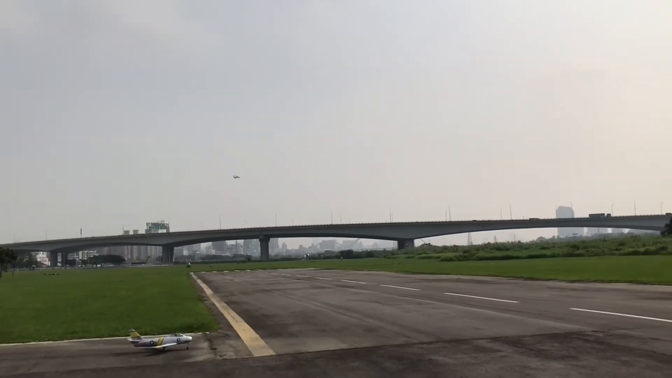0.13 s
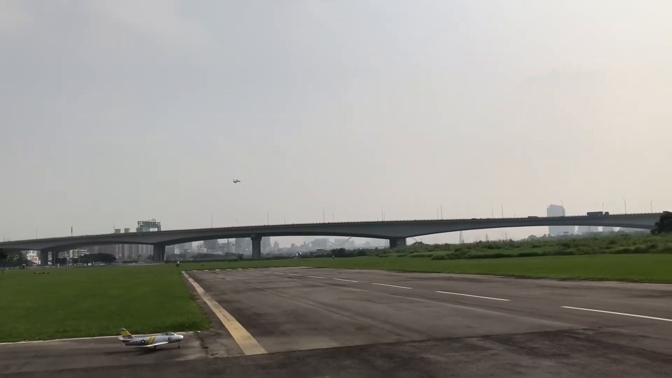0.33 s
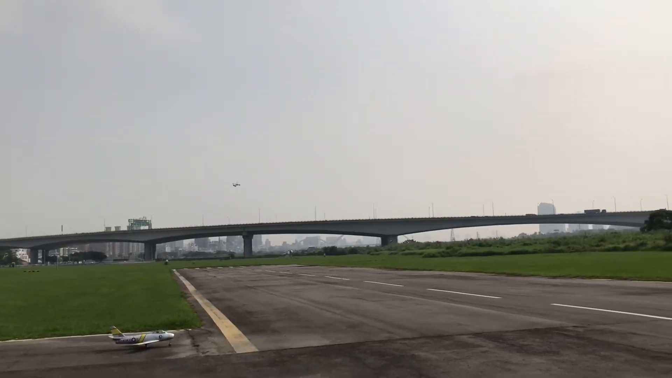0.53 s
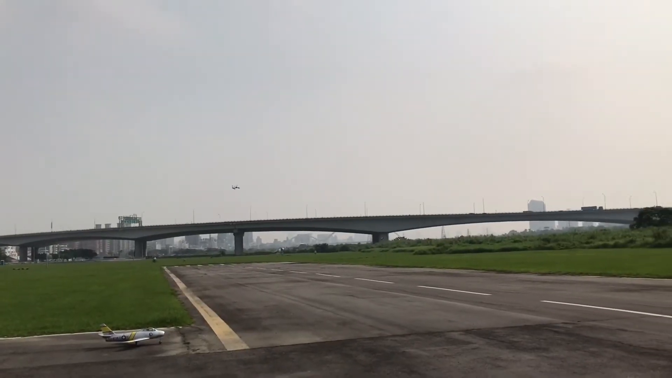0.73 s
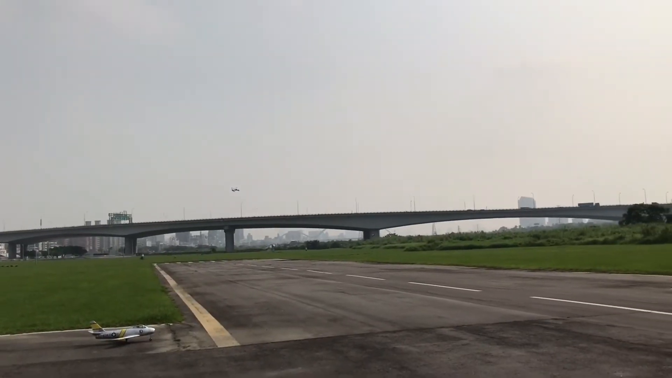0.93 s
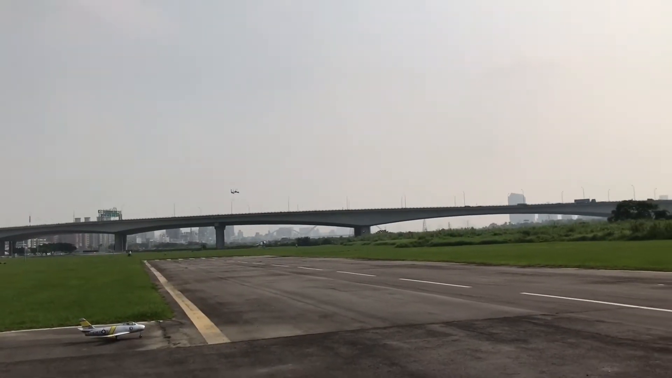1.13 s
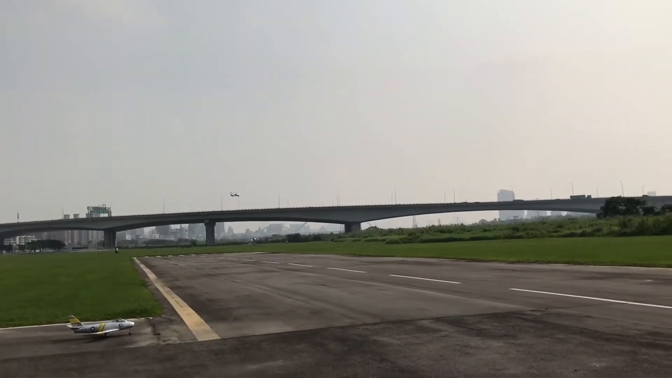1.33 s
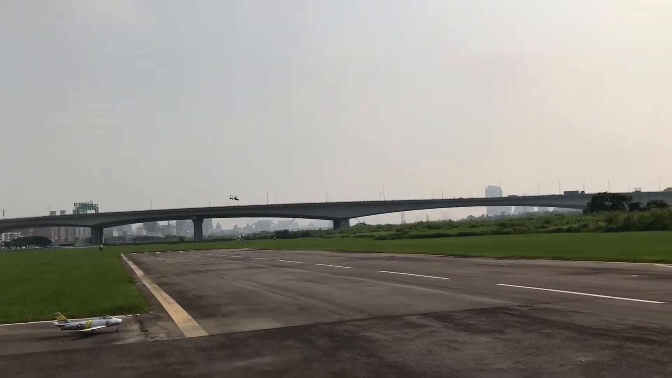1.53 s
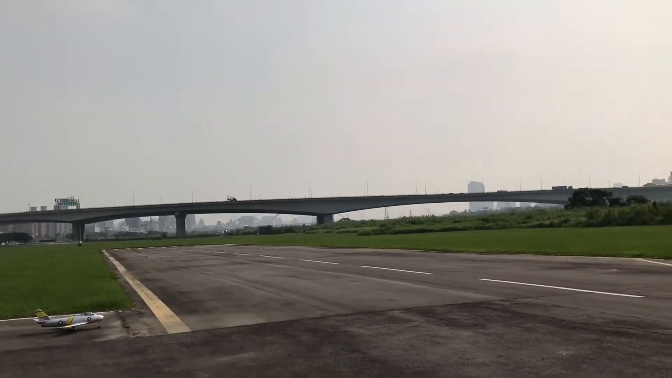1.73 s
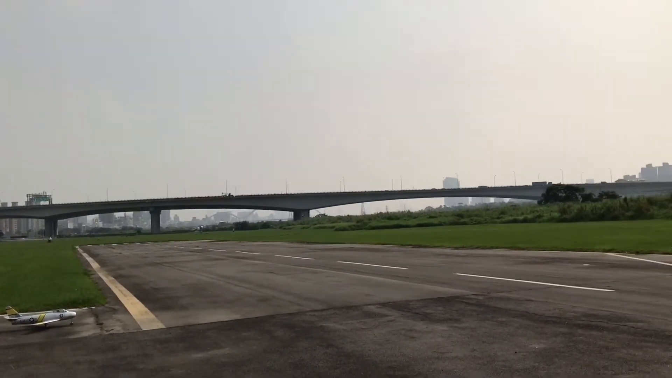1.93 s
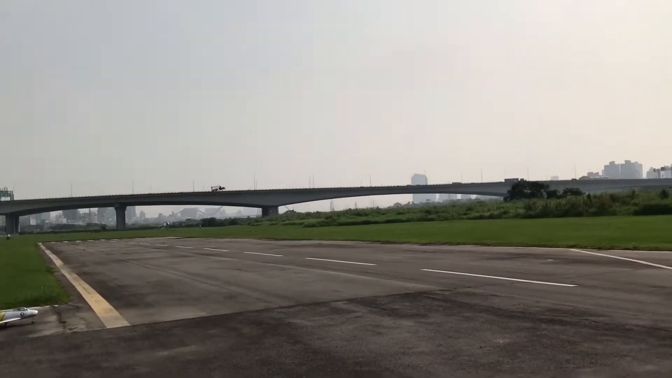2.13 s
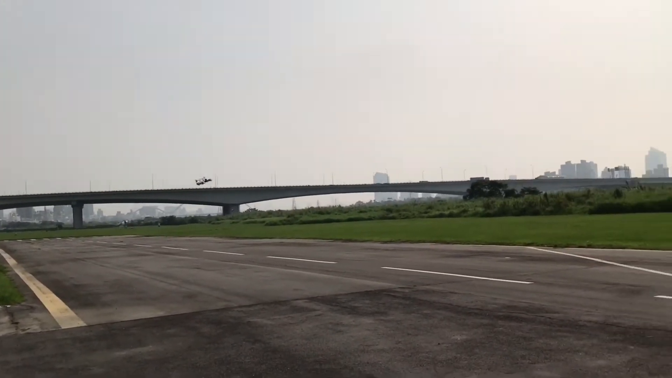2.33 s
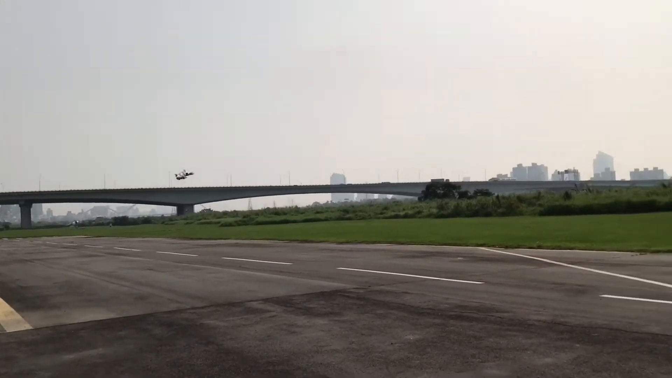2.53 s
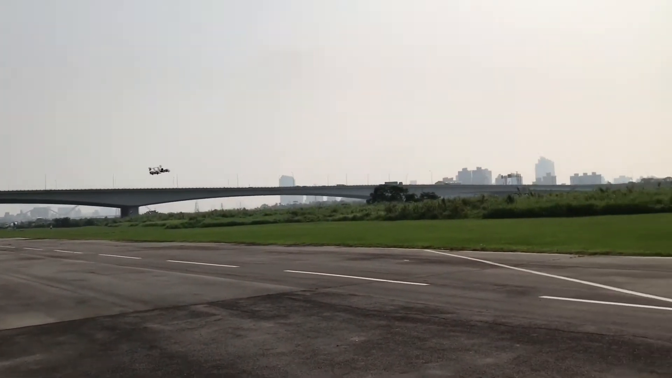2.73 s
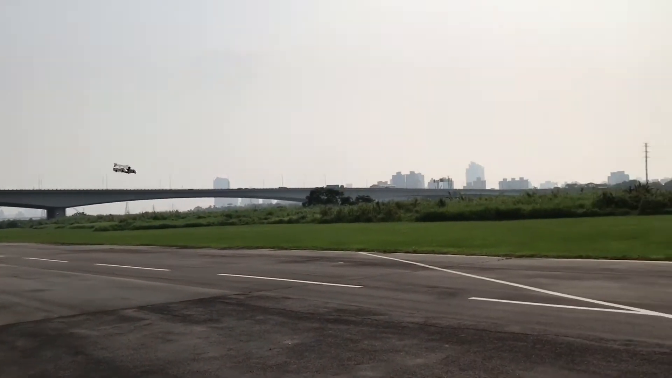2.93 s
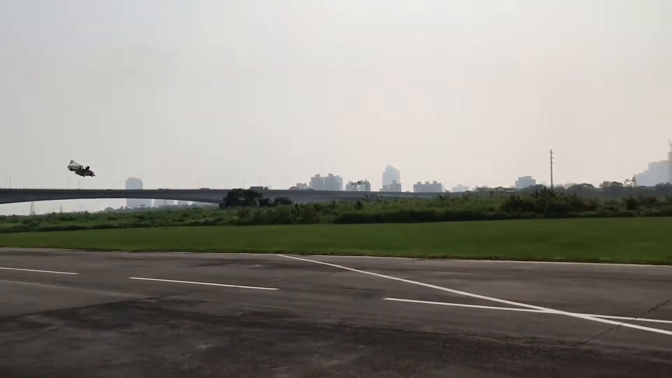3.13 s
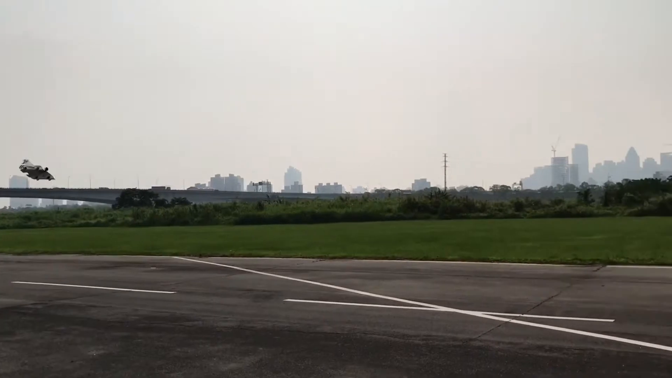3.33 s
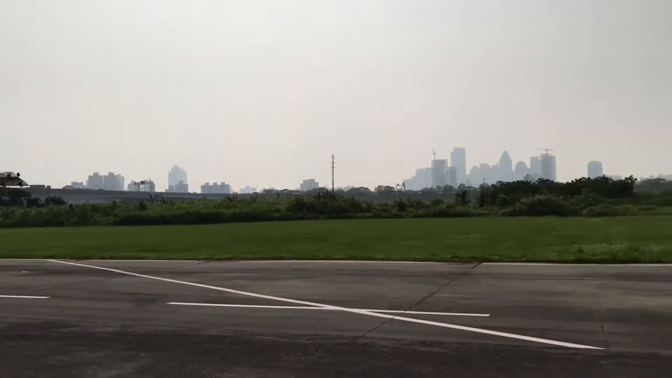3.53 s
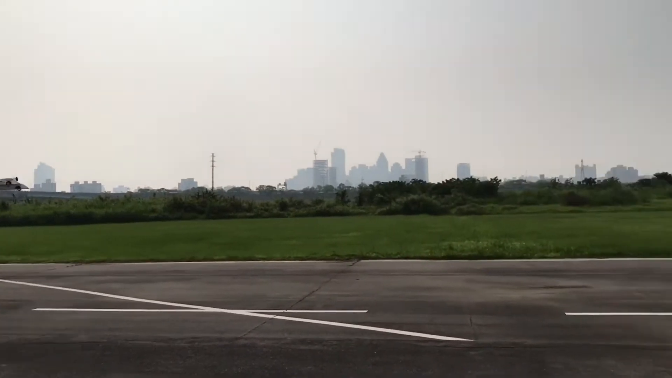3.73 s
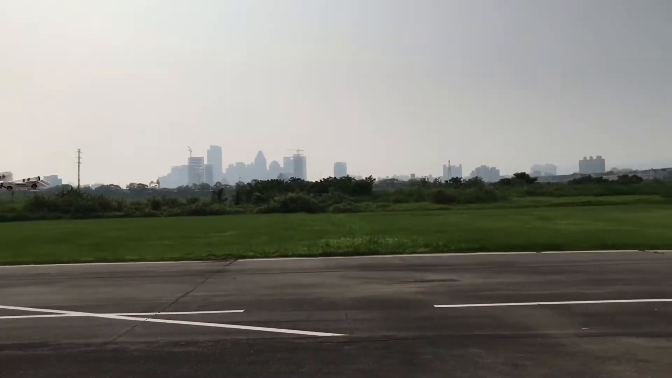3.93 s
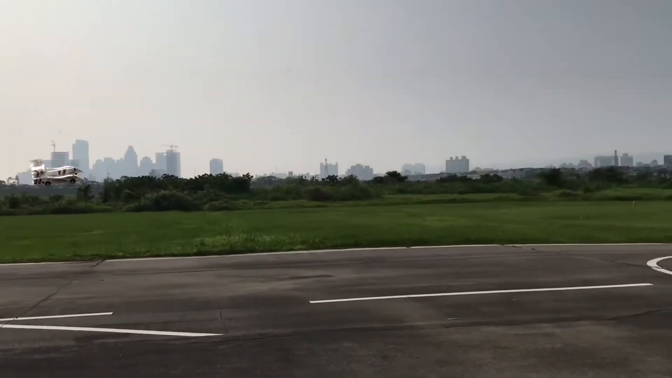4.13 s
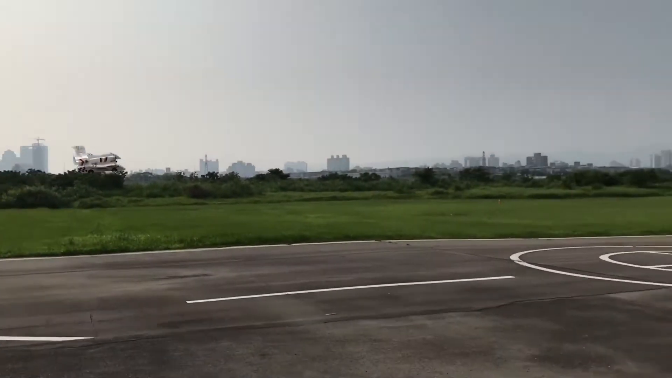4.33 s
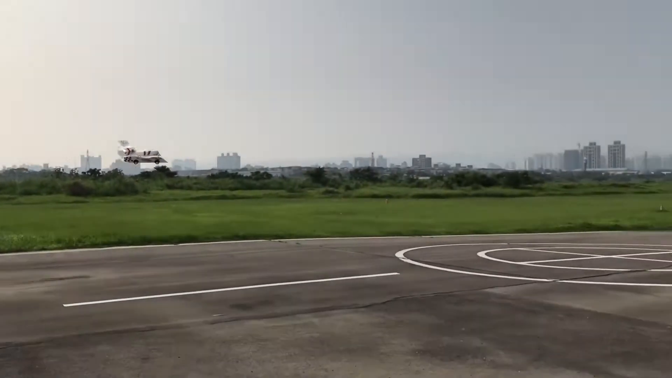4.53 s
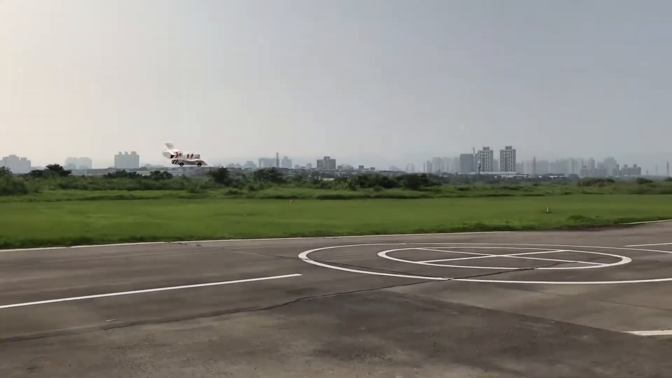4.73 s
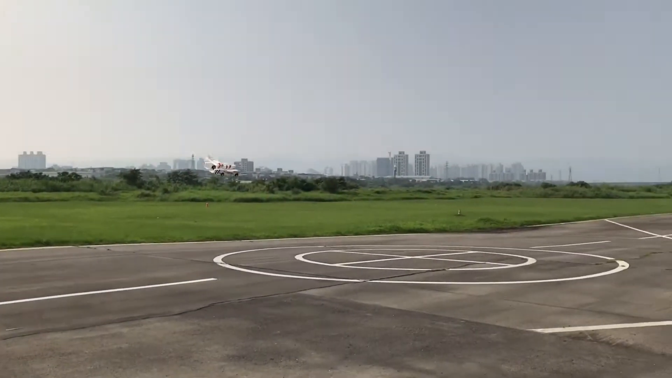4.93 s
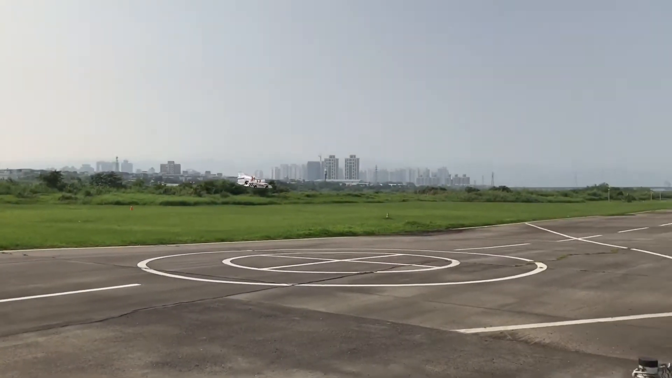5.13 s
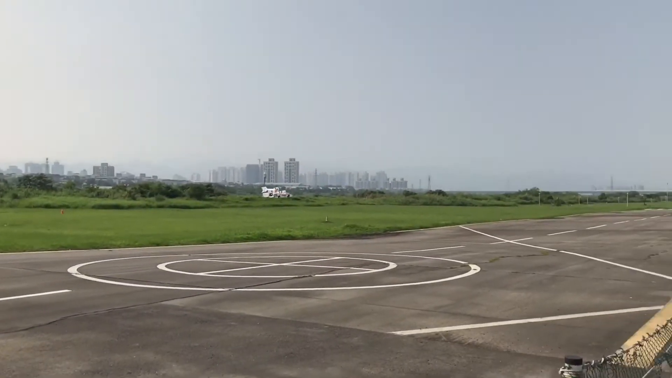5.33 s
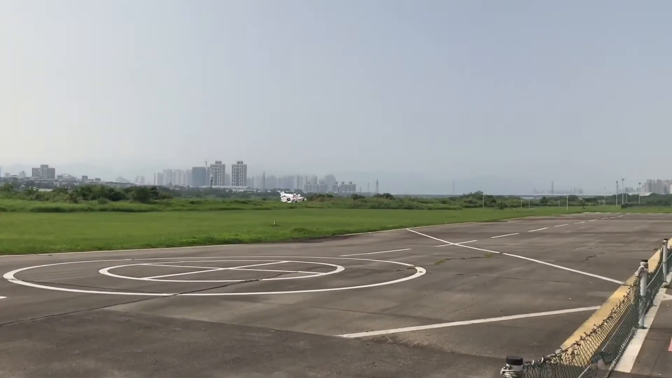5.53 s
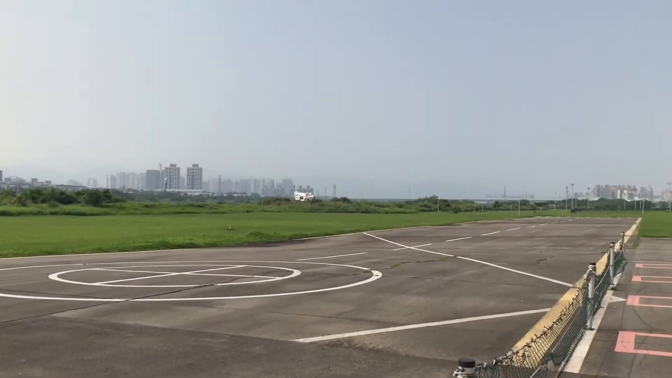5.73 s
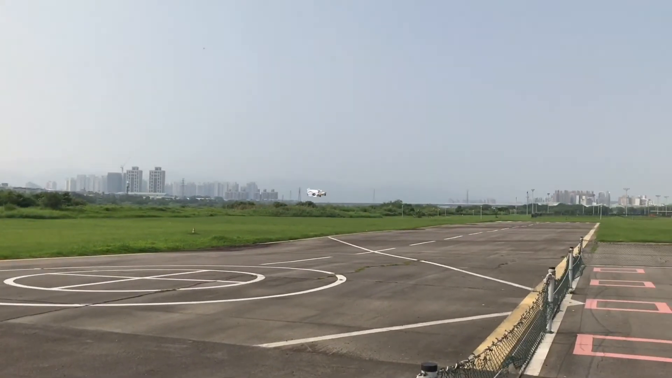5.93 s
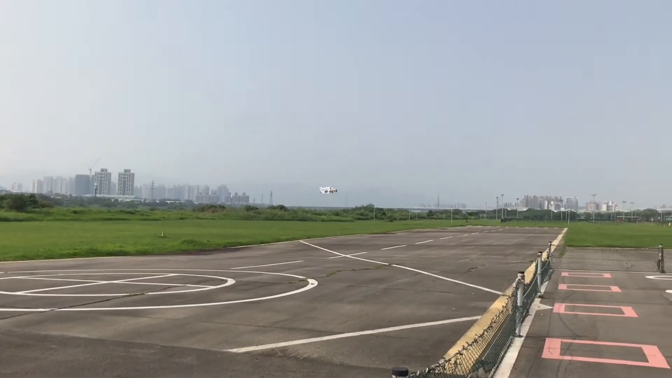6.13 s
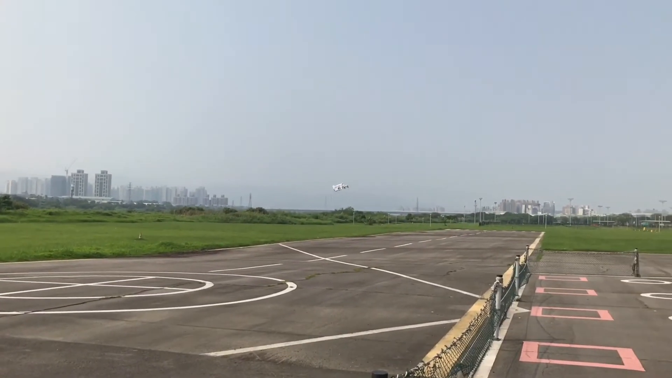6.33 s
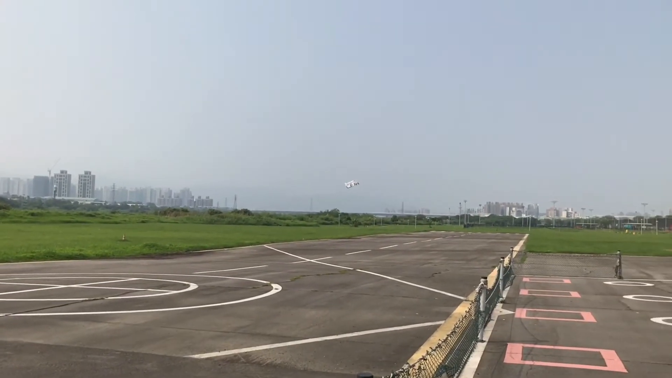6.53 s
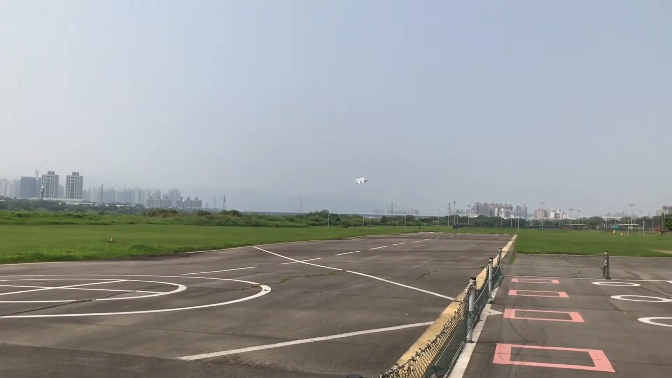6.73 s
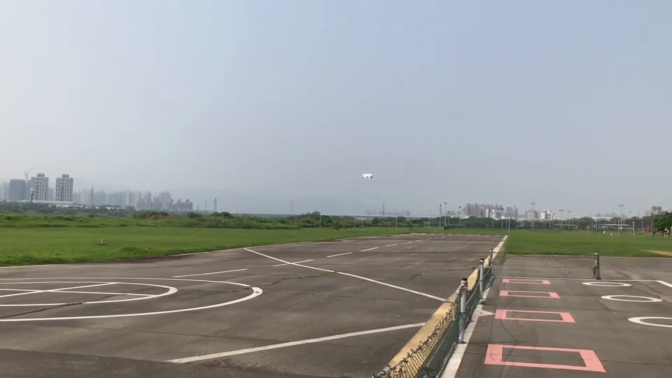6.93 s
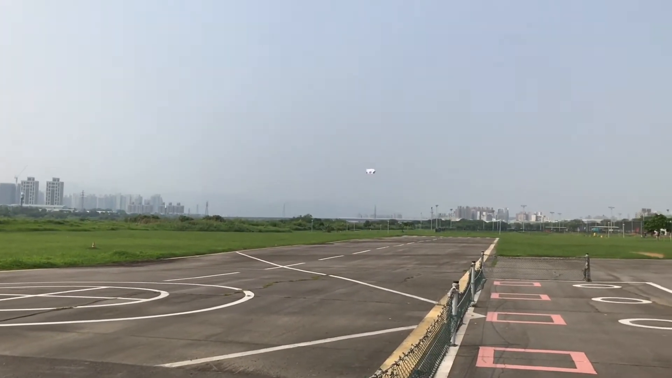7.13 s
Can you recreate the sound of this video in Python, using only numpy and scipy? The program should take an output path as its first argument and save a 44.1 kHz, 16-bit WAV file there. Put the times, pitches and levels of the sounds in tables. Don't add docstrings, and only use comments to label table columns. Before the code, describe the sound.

A handheld microphone at a flying field first catches quiet wind, distant road wash and tiny insect chirps beneath a faint high fan whine. The model jet comes closer, its rushing hiss swelling and its whine wavering and sagging slightly. Wind gusts thump and crackle on the microphone, with one sharp casing click. After the pass, the buffeting eases and the whine climbs quickly, then holds high as the jet departs.

```python
import sys
import numpy as np
from scipy import signal
from scipy.io import wavfile
from scipy.ndimage import uniform_filter1d, map_coordinates

SR = 44100
rng = np.random.default_rng(int(sys.argv[2]) if len(sys.argv) > 2 else 0)


def ratio_of_db(decibels):
    return 10 ** (np.asarray(decibels, float) / 20)


def unload_wav(signal):
    wavfile.write(
        sys.argv[1],
        SR,
        np.round(np.clip(np.atleast_2d(signal).T, -1, 1) * 32767).astype(np.int16),
    )


N = 317520
T = np.arange(N) / SR
BLADES = 12

# time_s, hiss_db, treble_db (against the hiss)
HISS = [(0, -60, -4), (.2, -56, -6), (.48, -57.5, -10.5), (.78, -53.5, -14), (.9, -53, 1),
        (1.06, -53, -4.5), (1.9, -53, -3.5), (2.36, -48.5, -5), (2.85, -51, -0.5), (3.27, -47, -1.5),
        (3.8, -46.5, -3.5), (4.25, -42, -6.5), (4.5, -47, -1.5), (4.95, -43, -6.5), (5.5, -44.5, -4.5),
        (5.9, -43, -4.5), (6.68, -46, -2.5), (7.2, -46.5, -5)]
# time_s, aim (0 nose on, 1 side on, 2 tail on)
AIM = [(0, 0.0067), (3.3, 0.2), (4.3, 0.41), (5.4, 1.2), (6, 1.2), (6.5, 1.56), (7.2, 1.58)]
# time_s, share (0-1)
ECHO = [(0, .7), (3.5, .66), (4.1, .48), (4.6, .6), (5.2, .55), (5.6, .55), (6.3, .62), (7.2, .68)]


def evened(x):
    return x / np.sqrt(np.mean(x ** 2) + 1e-20)


def curves(rows, t=T):
    s, *columns = np.transpose(rows)
    return [np.interp(t, s, column) for column in columns]


def read(points, hz):
    f, db = np.transpose(points)
    return np.interp(np.log(hz + 1), np.log(f + 1), db, left=-90, right=-90)


def add(mix, s, sound):
    part = mix[round(s * SR):][:len(sound)]
    part += sound[:len(part)]


def smooth(x, size):
    return uniform_filter1d(x, size=size, mode="nearest")


def flutter(rate):
    size = max(int(SR / rate), 1)
    wander = uniform_filter1d(rng.standard_normal(N), size, mode="wrap")
    return evened(uniform_filter1d(wander, size, mode="wrap"))


def swell(start, end):
    progress = np.clip((T - start) / (end - start), 0, 1)
    return np.sqrt(np.sin(np.pi * progress).clip(0))


def noise(db_field, size, patchy_db):
    hop = size // 4
    hz = np.fft.rfftfreq(size, 1 / SR)
    t = np.arange(N // hop + 5) * hop / SR
    real, imaginary, patches = rng.standard_normal((len(t), len(hz), 3)).T
    patches = uniform_filter1d(patches, size=10, axis=0)
    patches = evened(uniform_filter1d(patches, size=12, axis=1))
    z = (real + 1j * imaginary) * ratio_of_db(db_field(hz[:, None], t) + patchy_db * patches)
    return evened(signal.istft(z, nperseg=size, noverlap=size - hop)[1][:N])


def fan_hiss():
    # pitch_hz, level_db (per Hz)
    inlet = [(500, -6), (1300, 1.7), (2000, 1), (3000, 3.9), (4200, 2), (5500, 3), (7000, -4), (8000, -7),
             (9500, -8), (11500, -8.5), (13500, -9.5), (15000, -14.5), (15700, -16)]
    side_on = [(500, -3.5), (1300, 0), (2200, -1), (3400, 5.5), (4500, -0.5), (5500, 0), (6600, -6),
               (8000, -2.5), (9500, 0), (11500, -5.5), (13000, -5), (14500, -11), (15700, -6)]
    tailpipe = [(500, -13), (1300, -5), (2200, -0.5), (3000, -4), (3800, 6), (4900, -15), (6400, 2),
                (7800, -13.5), (9000, -12.5), (10200, -24), (11300, -3), (12500, 8.5), (13600, -5),
                (15700, -7)]

    def field(hz, t):
        def band_db(colour, low, high):
            inside = (hz[:, 0] > low) & (hz[:, 0] < high)
            return 10 * np.log10((ratio_of_db(colour[inside]) ** 2).sum(0))

        treble_db, aim = curves(HISS, t)[1], curves(AIM, t)[0]
        shares = [np.clip(1 - abs(aim - view), 0, 1) for view in range(3)]
        views = (inlet, side_on, tailpipe)
        colour = sum(share * read(view, hz) for share, view in zip(shares, views)) / sum(shares)
        colour = colour - band_db(colour, 1500, 5000)
        high_db = band_db(colour, 12500, 15500)
        tilt = np.clip(np.log(hz / 5000 + 1e-9) / np.log(2.6), 0, 1)
        wavering_db = .9 * np.interp(t, T, flutter(14))
        return colour + tilt * (uniform_filter1d(treble_db, size=8) + wavering_db - high_db)

    hiss = noise(field, size=512, patchy_db=0.98)
    midband = signal.butter(4, [1500, 5000], "band", fs=SR, output="sos")
    hiss = hiss / np.std(signal.sosfilt(midband, hiss))
    level_db = uniform_filter1d(curves(HISS)[0], size=4000)
    return ratio_of_db(level_db + .5 * flutter(25) + 0.56 * flutter(5.5)) * hiss


def blade_hz():
    # time_s, pitch_hz
    pitch = [(0.0, 5183.0), (0.21, 5193.0), (0.42, 5350.0), (1.49, 5368.0), (1.6, 5407.0), (2.35, 5368.0),
             (3.0, 5368.0), (3.55, 5325.0), (4.21, 5181.0), (5.07, 5074.0), (5.2, 5096.0), (5.33, 5217.0),
             (5.67, 5205.0), (5.8, 5430.0), (5.93, 5845.0), (6.02, 5915.0), (6.23, 5952.0), (7.2, 5905.0)]
    return smooth(curves(pitch)[0], 2600)


def shaft_angle():
    return 2 * np.pi * np.cumsum(blade_hz() / BLADES) / SR


def tone(multiple, gain, waver_db):
    turn = multiple * (shaft_angle() + .016 * flutter(45))
    return np.sqrt(2) * gain * ratio_of_db(waver_db * flutter(45)) * np.sin(turn)


def beamed():
    # aim (0-2), blade_db, octave_db, half_pitch_db
    beam = [(.02, -10.5, -12, -12.5), (.06, -1, -7.5, -6.5), (.14, -4.5, -8, -10), (.22, 0, -5, -6),
            (.33, -8, -19, -7.5), (.5, -1.5, 0.5, -5.5), (.85, -6.5, -8, -12.5), (1.15, 4.5, 1, -11),
            (1.5, -2, -9.5, -17), (1.64, 1.5, -1.5, -16), (1.75, 0, -5, -14)]
    level_db = uniform_filter1d(curves(HISS)[0], size=12000)
    return [ratio_of_db(level_db + db) for db in curves(beam, curves(AIM)[0])]


def twin(order):
    beats_per_s, null_s = 3.57, 3.66
    share = .8 * swell(3.3, 5.2)
    second_fan = share * np.exp(2j * np.pi * order * beats_per_s * (T - null_s))
    return abs(1 - second_fan) / np.sqrt(1 + share ** 2)


def glints():
    shaft_orders = [(3, 1.5, 2.7, -10), (3, 2.9, 3.6, -12), (3, 3.9, 5.05, -6.5), (10, .62, 1.1, -7),
                    (10, 2, 3.6, -11), (10, 4.1, 5.2, -13), (11, 3.95, 4.75, -6.5), (11, 6.2, 7.1, -14),
                    (8.5, 4.3, 4.9, -14), (13, 2, 2.4, -13), (7, 5.9, 7.3, -15), (18, 2.8, 4.4, -15),
                    (18, 6.7, 7.4, -14), (21, .3, 1.9, -18), (25, 3.3, 7, -16), (27, 3.8, 4.3, -10),
                    (28, .7, 1.3, -14), (29, 1.4, 3.7, -13), (30.5, 4.2, 4.9, -9), (36, 3.7, 5.9, -11),
                    (36, -.2, .4, -12)]
    shaft = shaft_angle() + .015 * flutter(40)
    out = np.zeros(N)
    for multiple, start, end, db in shaft_orders:
        out += ratio_of_db(db + 2.2 * flutter(10)) * swell(start, end) * np.sin(multiple * shaft)
    return ratio_of_db(uniform_filter1d(curves(HISS)[0], size=12000)) * out


def echo_of(x):
    # time_s, delay_ms
    lag = [(0, 1.493), (.53, 1.236), (1.185, .996), (1.46, .963), (1.935, .76), (2.19, .845), (2.6, 1.055),
           (2.95, 1.316), (3.435, 1.601), (3.955, 1.77), (4.58, 1.915), (4.83, 1.78), (5.1, 1.5),
           (5.4, 1.07), (5.55, .952), (5.705, .904), (6.35, 1.047), (7.2, 1.203)]
    lag_ms = smooth(curves(lag)[0], 4000) + .006 * flutter(30)
    return map_coordinates(x, [np.arange(N) - lag_ms * SR / 1000], order=3)


def off_pavement(x):
    dull = signal.filtfilt(*signal.butter(1, 10000, fs=SR), echo_of(x))
    share, = curves(ECHO)
    return (x + share * (1 + 0.19 * flutter(12)) * dull) / np.sqrt(1 + share ** 2)


def whine():
    blade, octave, _ = beamed()
    spool = ratio_of_db(-10 * (np.gradient(blade_hz()) * SR / 3000) ** 4)
    low = tone(BLADES, blade * spool * twin(order=1), 1.2) + ratio_of_db(-1.5) * glints()
    high = tone(2 * BLADES, octave * twin(order=2), 2.2)
    return low + high + curves(ECHO)[0] ** 3 * echo_of(2.6 * low + 1.7 * high)


def jet():
    hum = tone(BLADES / 2, beamed()[2], 1.2)
    return off_pavement(fan_hiss() + hum) + whine()


def puff(hz, ms):
    t = np.arange(-.02, .02, 1 / SR)
    u = t / (ms / 1000)
    cycles = hz * t * (1 - 0.25 * np.tanh(u)) + rng.random()
    return np.exp(-1.6 * u ** 2) * np.cos(2 * np.pi * cycles)


def eddy_patter():
    patter = np.zeros(N)
    for hz in np.geomspace(150, 560, num=14):
        strength = ratio_of_db(2.1 * np.minimum(rng.exponential(1, N), 3))
        strikes = strength * (rng.random(N) < 26 / SR)
        eddy = puff(hz, 1100 / hz) * ratio_of_db(-1.5 * np.log2(hz / 300))
        patter += signal.oaconvolve(strikes, eddy, "same")
    return patter


def wind():
    # time_s, rumble_db, buffet_db (against the rumble)
    gusts = [(0, -35.5, -21), (2.1, -37.5, -19), (2.3, -33.5, -23), (2.52, -38.5, -12), (2.61, -25, -24),
             (2.67, -33, -20), (2.87, -22, -11), (3.07, -35, -8), (3.15, -29, -12), (3.23, -30.5, -13),
             (3.3, -24, -8), (3.45, -31, -11), (3.56, -23, -9), (4.1, -28, -1.5), (4.45, -23.5, -7),
             (4.7, -30, -6.5), (5.15, -35.5, -11), (7.2, -34.5, -18)]
    # pitch_hz, level_db (per Hz)
    rumble_colour = [(12, -56), (20, -55), (36, -10), (65, 2.5), (97, -3.5), (145, -3), (173, -12.5),
                     (211, -10), (330, -23), (430, -34.5), (730, -120)]
    # time_s, peak_db, pitch_hz
    pushes = [(.16, -25, 110), (1.389, -25, 150), (1.475, -26.5, 158), (1.979, -30, 170),
              (2.949, -13.5, 118), (4.12, -19, 70), (4.52, -19, 150), (4.895, -21.5, 200),
              (4.956, -23.5, 303), (3.148, -18, 170), (6.0, -20.5, 70), (6.98, -27.5, 140)]
    # time_s, peak_db, pitch_hz, length_ms
    pops = [(2.729, -20.5, 433, 4), (2.796, -20.5, 610, 7.8), (2.818, -13, 680, 3.2),
            (2.856, -8.5, 464, 3.4), (3.009, -22, 485, 6), (3.08, -21.5, 440, 5), (3.285, -17, 410.0, 5.2),
            (3.296, -13, 530, 2.7), (3.366, -20, 422, 10), (3.61, -17, 450.0, 4.8),
            (3.673, -17.5, 436, 5.3), (3.685, -8.5, 544, 3), (3.753, -16, 555, 3.1),
            (3.797, -14.5, 577, 1.9), (3.841, -18, 513, 3.4), (3.889, -11.5, 490.0, 0.89),
            (3.899, -15, 450, 4.8), (3.915, -16, 440.0, 2.5), (4.013, -22, 453, 4.4),
            (4.136, -14.5, 520, 4), (4.268, -20, 580.0, 0.95), (4.277, -17.5, 480, 5),
            (4.31, -15, 404, 6.1), (4.466, -19, 520, 2), (4.61, -22.5, 490, 4), (4.649, -17.5, 560, 1.13),
            (4.856, -17, 500, 4.8), (4.921, -19.5, 430, 4), (5.032, -25, 480, 10), (5.074, -15.5, 485, 2.4)]
    rumble_db, buffet_db = curves(gusts)
    rumble = noise(lambda hz, t: read(rumble_colour, hz) + 0 * t, size=2048, patchy_db=1.19)
    lumps = ratio_of_db(1.38 * flutter(36) + 1.04 * flutter(4.8))
    buffeting = ratio_of_db(buffet_db + 0.5) * evened(lumps * eddy_patter())
    out = ratio_of_db(rumble_db) * (evened(lumps * rumble) + buffeting)
    for s, db, hz in pushes:
        add(out, s - .02, ratio_of_db(db) * puff(hz, 7.7))
    for s, db, hz, ms in pops:
        add(out, s - .02, ratio_of_db(db - 1.0) * puff(0.88 * hz, 0.66 * ms))
        add(out, s - .018, ratio_of_db(db + 1) * puff(124, 3.05))
        add(out, s - .021, ratio_of_db(1.28 * db - 12.5) * puff(1.66 * hz, 1.56))
    return out


def road_wash():
    # pitch_hz, level_db (per Hz)
    far_colour = [(180, -25), (300, 5), (428, -11.5), (511, -9), (735, -9.5), (1270, -6.5), (1780, -14),
                  (2500, -16.5), (3250, -26), (5500, -120)]
    wash = noise(lambda hz, t: read(far_colour, hz) + 0 * t, size=1024, patchy_db=1.0)
    return ratio_of_db(-48.5 - 6.0) * wash


def insect():
    # start_s, length_s, level_db, pitch_hz
    chirps = [
        (.132, .03, -53, 5440),
        (.252, 0.039, -54, 5230),
        (0.976, 0.028, -50, 5300),
    ]
    out = np.zeros(N)
    for s, length, db, hz in chirps:
        t = np.arange(0, length, 1 / SR)
        scrapes = np.sin(np.pi * 155 * t) ** 4 * np.sin(np.pi * t / length) ** .6
        jolts = 2 * np.pi * rng.random(8)[(155 * t).astype(int) % 8]
        rising_t = t + 0.96 * (t - length / 2) ** 2
        add(out, s, ratio_of_db(db + 7.0) * scrapes * np.sin(2 * np.pi * hz * rising_t + jolts))
    return out


def ticks():
    # start_s, peak_db, pitch_hz, t20_s (time to fall 20 dB)
    clicks = [
        (.187, -42, 6200, .002),
        (3.235, -25, 7200, 0.017),
        (3.238, -24.5, 990, 0.012),
        (3.236, -33, 3000, 0.0089),
    ]
    out = np.zeros(N)
    t = np.arange(2000) / SR
    for s, db, hz, t20 in clicks:
        band = signal.butter(2, [hz * .75, hz * 1.5], "band", fs=SR)
        burst = signal.lfilter(*band, rng.standard_normal(len(t)))
        add(out, s, ratio_of_db(db - 60 * t / (3 * t20)) * evened(burst) * .5)
    return out


def scene():
    return (jet() + wind() + road_wash() + insect() + ticks())[None]


def low_pass(x):
    return signal.sosfilt(signal.butter(12, 16120, fs=SR, output="sos"), x)


def record(dry):
    bass_cut = signal.butter(3, 30, "high", fs=SR, output="sos")
    treble_cut = signal.firwin(1023, 15760, window=("kaiser", 9), fs=SR)
    mix = signal.sosfilt(bass_cut, dry)
    mix = signal.oaconvolve(mix, treble_cut[None], "same")
    return low_pass(mix)


dry = scene()
out = record(dry)
unload_wav(out)
```